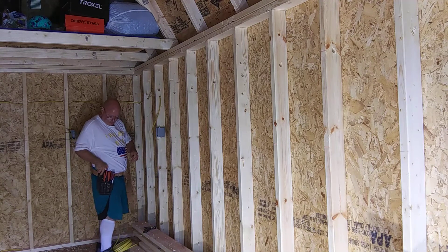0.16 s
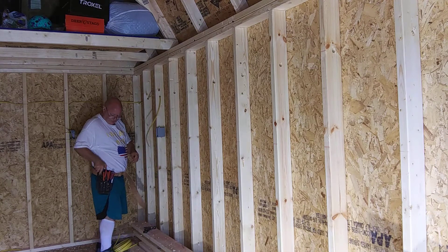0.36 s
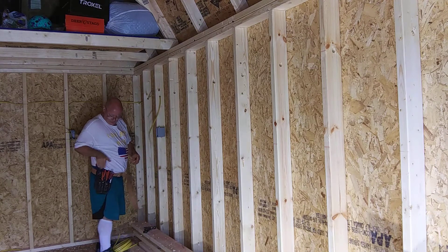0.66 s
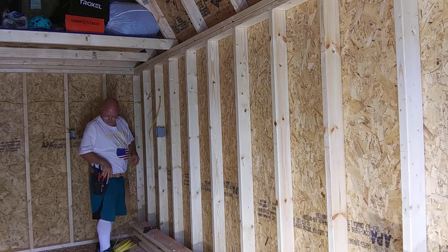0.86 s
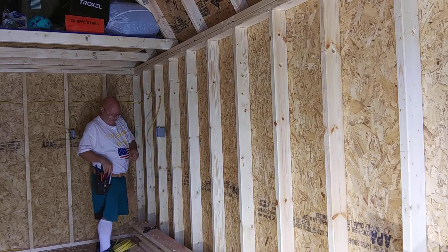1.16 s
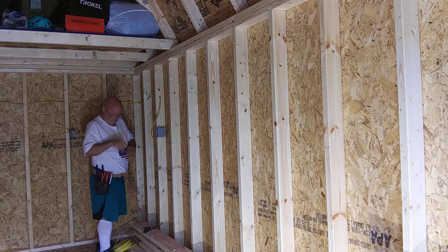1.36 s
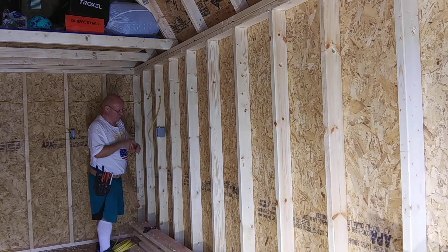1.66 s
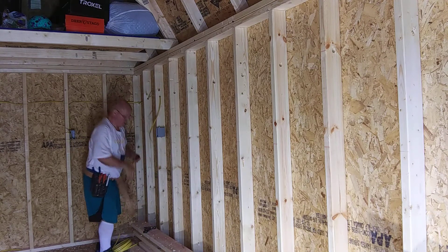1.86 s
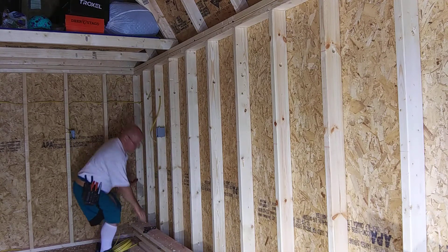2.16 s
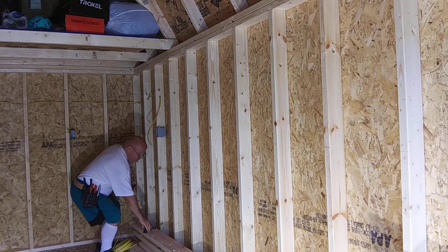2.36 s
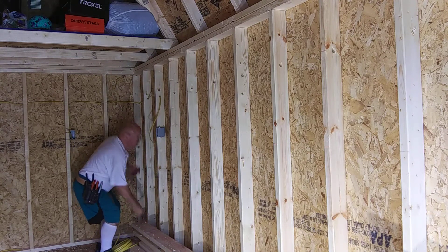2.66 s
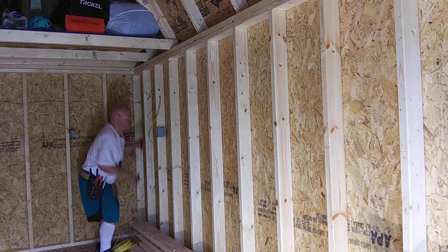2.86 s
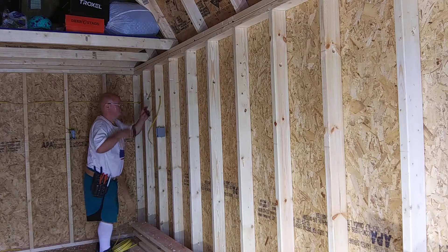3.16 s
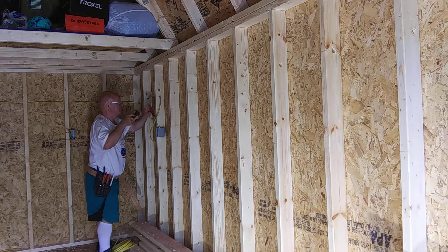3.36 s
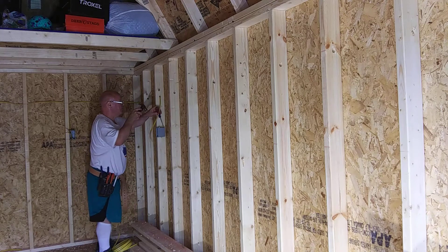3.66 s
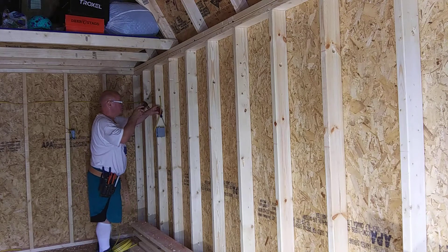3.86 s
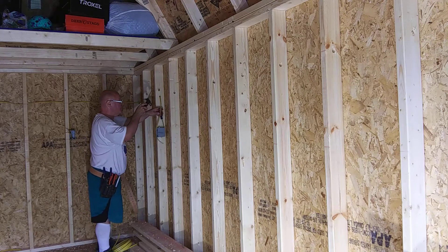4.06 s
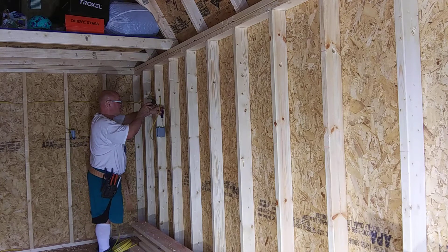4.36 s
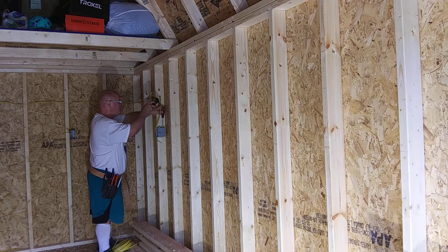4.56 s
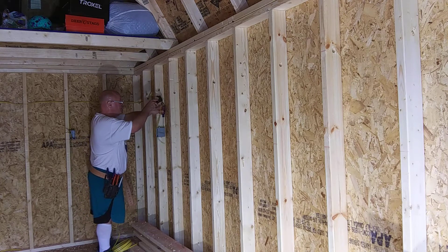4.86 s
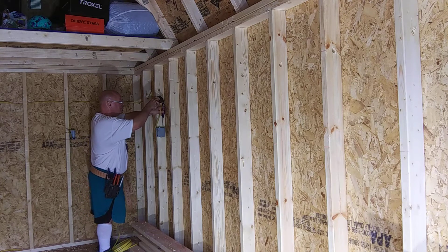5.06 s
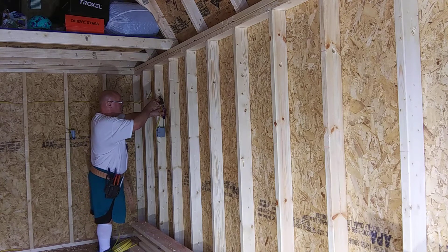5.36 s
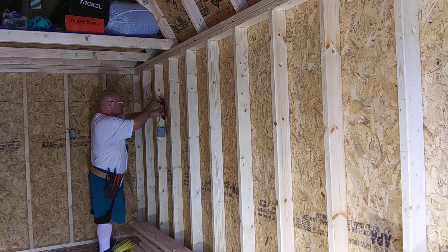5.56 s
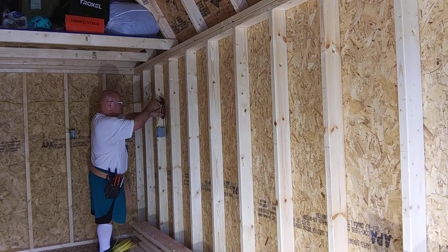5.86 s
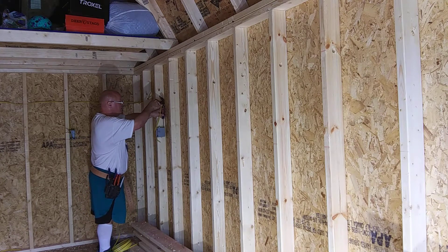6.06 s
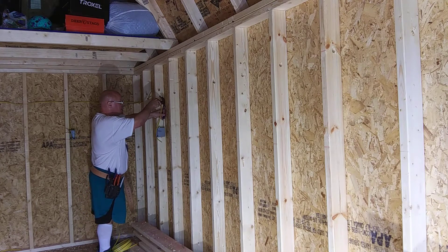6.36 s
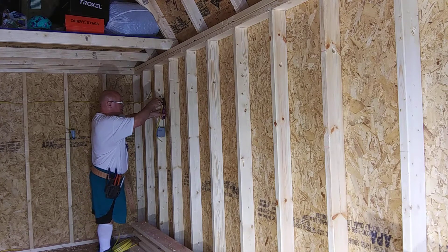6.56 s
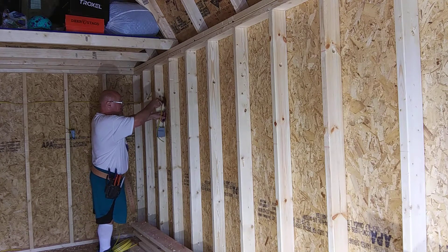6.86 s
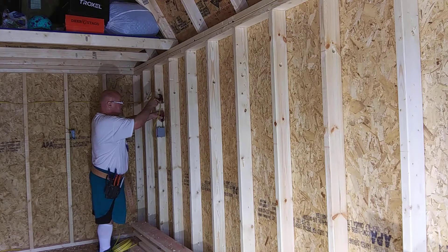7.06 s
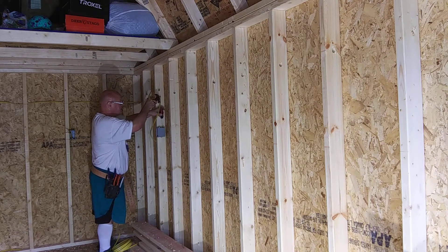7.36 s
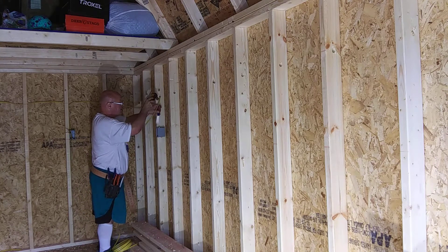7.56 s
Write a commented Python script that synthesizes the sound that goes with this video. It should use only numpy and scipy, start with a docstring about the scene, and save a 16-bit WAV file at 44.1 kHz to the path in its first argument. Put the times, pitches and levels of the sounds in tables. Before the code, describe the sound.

In a bare wooden shed, an electrical cable is dragged through stud holes with a bright, gritty rasp that catches and surges, over a faint low groan. It stops at about three seconds. Soft hand rustles lead to irregular hollow knocks on the wall, a small click, a dull thump and one hard, cracking blow, then a few faint taps. The fixed microphone stands some distance away in the short, boxy reverberation.

```python
"""Cable pulled through shed studs

An electrical cable rasps through holes in the studs of a bare wooden shed, catching and groaning, then rests.
After a soft rustle come light knocks on the wall, a click, a dull thump and one hard blow.
Random slips and short contacts drive resonant bodies, and a synthetic room carries most of each of them.
Sines make the groan, a hollow tock and the floor; filtered noise makes the rustle and the faint air."""
import sys
import numpy as np
from scipy import signal
from scipy.fft import rfft, irfft, next_fast_len
from scipy.io import wavfile
from scipy.ndimage import uniform_filter1d, map_coordinates

SR = 44100
rng = np.random.default_rng(int(sys.argv[2]) if len(sys.argv) > 2 else 0)


def dump_mix(stems):
    """Bounce the given channels to the path in sys.argv[1] as a 16-bit WAV at rate SR."""
    frames = np.atleast_2d(stems).T  # one column per channel
    limited = np.clip(frames, -1, 1)  # hard clip at full scale
    pcm = np.round(limited * 32767).astype(np.int16)
    wavfile.write(sys.argv[1], SR, pcm)


N = 340893   # length in samples

# All colours and resonances give relative levels; each sound is scaled to its loudness later.
# Colour of the rasp. Each row: frequency in Hz, level in dB.
RASP_COLOUR = [(60, -47), (130, -46), (200, -20.5), (350, -21), (420, -9.5), (560, -13.5), (800, -13.5),
               (1100, -6.5), (2000, -10), (2300, -11.5), (2700, -1.5), (3700, -9), (7400, -12),
               (9000, -20.5), (10300, -33.5), (15500, -44)]
# Resonances of cable and stud. Each row: frequency in Hz, half-width in Hz, level in dB.
CABLE_MODES = [(1026, 27, 1.5), (1996, 157, -1), (2531, 64, 8), (3080, 130, 0.5), (3267, 35, 3.5),
               (4070, 150, -2), (4954, 280, -2), (5490, 66, -31.5), (6200, 31, -87), (7076, 90, -2.5),
               (7840, 27, -21)]
# How far each band of the rasp flutters on its own. Each row: frequency in Hz, spread in dB.
FLUTTER_SPREAD = [(400, 3), (1050, 1.5), (2600, 1), (5000, -0.5), (7300, 2.5), (12000, 5)]
# Catches in a hole before the cable jerks free. Each row: time in seconds, strength in dB, time held back in seconds.
CATCHES = [(0.053, 4.5, 0.017), (.195, 3, 0.075), (.33, 1.5, 0.062), (.435, 4, 0.011), (.555, 1, 0.1),
           (.83, 3.2, 0.015), (.95, 2, 0.015), (1.075, 3, 0.07), (1.34, 1.5, 0.07), (1.695, 2, .13),
           (1.8, 2.2, 0.016), (2.05, 5, 0.0091), (2.205, 1, 0.031), (2.334, 5, 0.013), (2.44, 3.5, 0.065),
           (2.65, 0.5, 0.052), (2.765, 0, .015)]
# Colour of hands rubbing the cable. Each row: frequency in Hz, level in dB.
RUB_COLOUR = [(76, -58), (130, -37), (188, -16.5), (263, -21.5), (432, -10), (471, 3), (520, -22),
              (762, -6), (2500, -38), (3250, -50), (5500, -120)]
# Rubs of the hands. Each row: start in seconds, level in dB before attack and trim, decay in seconds.
RUBS = [(3.435, -53.5, 0.13), (3.515, -53, 0.12), (3.805, -55.5, 0.066)]
# Slides and squeaks of the sheath. Each row: start in seconds, level at the top in dB, centre in Hz,
# half-width in Hz, time to the top in seconds.
SWISHES = [(0.099, -47, 1034, 25, 0.027), (3.271, -67.5, 5130, 350, 0.048), (3.351, -65.5, 2440, 230, .08),
           (3.40, -69.5, 6340, 650, 0.059), (3.499, -73, 2820, 350, 0.08), (3.70, -64, 1250, 150, 0.09),
           (5.28, -50, 5360, 1100, 0.017), (5.461, -49.5, 3770, 700, 0.017), (5.56, -58, 2900, 400, 0.03),
           (7.322, -55, 3000, 400, 0.045)]
# Knocks on the wall. Each row: time in seconds, then ring, thud and crack in dB before the trim of each layer,
# ring pitch in Hz, thud pitch in Hz.
KNOCKS = [(4.063, -21.5, -40, -41, 1420, 490), (4.112, -28, -42, -54, 1440, 480),
          (4.227, -22.5, -30, -36.5, 1450, 382), (4.25, -23, -34, -48, 1260, 375),
          (4.603, -55.5, -57, -69, 1060, 550), (5.227, -36, -38, -54, 1190, 476),
          (5.311, -20.5, -36, -43, 1090, 477), (5.333, -30, -40, -55, 1070, 480),
          (5.48, -28.5, -40.5, -46.5, 1220, 330), (5.565, -41.5, -54, -61, 993, 356),
          (5.69, -25.5, -44.5, -51.5, 1410, 324), (5.794, -34.5, -43.5, -60.5, 1260, 467),
          (5.979, -47.5, -69, -61.5, 1270, 374), (6.135, -43, -45.5, -60.5, 1180, 332),
          (6.29, -45, -45.5, -73, 1200, 430), (6.356, -38, -44.5, -61.5, 1140, 480),
          (7.044, -37.5, -46, -63.5, 996, 360), (7.066, -38.5, -61, -64, 1200, 475),
          (7.294, -39, -47.5, -65, 1240, 463), (7.327, -32.5, -43, -56.5, 1190, 540),
          (7.365, -33, -40.5, -60, 1250, 471), (7.415, -43, -45.5, -56.5, 1040, 342),
          (7.699, -54, -68, -73, 1070, 590)]
# Colour of the stud wall. Each row: frequency in Hz, level in dB.
WALL_COLOUR = [(60, -69), (110, -39), (200, -22.5), (310, -10), (500, -10), (730, -14), (1030, 4.5),
               (1400, -5), (1700, -7), (1920, -22.5), (2450, -8.5), (3150, -25), (4000, -29), (9000, -55.5)]
# Resonances of the stud wall. Each row: frequency in Hz, half-width in Hz, level in dB before a random change.
WALL_MODES = [(378, 26, -5), (473.2, 15, 0), (618, 21, -8), (1046, 52, 2.5), (1182, 51, 7), (1288, 18, 5),
              (1415, 30, 4.5), (1680, 68, -5.5), (2132, 37, -9), (2458, 79, -6), (2910, 93, -14),
              (3140, 24, -9)]
# Colour of the bright crack of the touch. Each row: frequency in Hz, level in dB.
CRACK_COLOUR = [(200, -53), (1500, -33), (3000, 2), (5000, 2.5), (6600, -3.5), (8500, -12), (11000, -22),
                (15500, -32)]
# Resonances of the crack. Each row: frequency in Hz, half-width in Hz, level in dB.
CRACK_MODES = [(2950, 75, 8), (4120, 100, -3), (5230, 96, -13), (6200, 200, -11.5)]
# Colour of the click. Each row: frequency in Hz, level in dB.
CLICK_COLOUR = [(200, -60), (2500, -22), (4300, -14), (4700, -8), (5400, -8), (6200, -4), (7000, -7),
                (8000, -21), (12000, -39)]
# Colour of the dull thump. Each row: frequency in Hz, level in dB.
THUMP_COLOUR = [(53, -79.5), (90, -55), (286, -15), (362, -13), (478, -10.5), (555, -18), (605, -9),
                (948, -7), (1200, -7), (1360, -28), (1690, -15), (2280, -33), (2480, -31), (3280, -34.5),
                (15000, -55.5)]
# Resonances of the thump. Each row: frequency in Hz, half-width in Hz, level in dB.
THUMP_MODES = [(420, 76, -22), (940, 130, 5), (1180, 27, 4), (1700, 82, -1), (2080, 32, -6),
               (2420, 24, -21)]
# Colour of the snap that leads the hard blow. Each row: frequency in Hz, level in dB.
SNAP_COLOUR = [(100, -32), (600, -5.5), (2500, -4), (4500, -0.5), (6300, 0), (9000, -11.5), (12000, -18.5),
               (15800, -22)]
# Colour of the hard blow. Each row: frequency in Hz, level in dB.
BLOW_COLOUR = [(53, -83), (90, -53.5), (127, -34), (359, -5.5), (392, -3), (553, -5), (630, 1), (1150, 3.5),
               (1290, 0.5), (1400, 1), (1940, -6.5), (2510, 0), (3630, -18), (6100, -30.5), (15800, -57.5)]
# Resonances of the blow. Each row: frequency in Hz, half-width in Hz, level in dB.
BLOW_MODES = [(1010, 15, -6), (1220, 46, 3), (1650, 43, -0.5), (1990, 50, -10), (2454, 28, 10),
              (3120, 40, 3), (3630, 55, -17), (5140, 24, -5), (5500, 64, -13), (6400, 62, -18)]
# Thuds of the floor. Each row: start in seconds, level in dB.
FLOOR_THUDS = [(4.228, -72), (6.488, -64), (6.75, -63), (7.322, -66)]
# Colour of the still air. Each row: frequency in Hz, level in dB.
AIR_COLOUR = [(15, -90), (25, -54), (241, -13), (425, -1), (473, -3.5), (542, -12), (587, -1.5),
              (710, -5.5), (769, -2), (1320, -7), (1430, -9), (2460, -14), (3050, -20.5), (4450, -17),
              (15800, -29.5)]
# Decay of the shed. Each row: frequency in Hz, time to fall 60 dB in seconds before the life factor.
SHED_DECAY = [(150, 1), (400, 0.63), (1200, 0.57), (2700, 0.4), (6000, 0.55), (13000, 0.22)]

# The pull: start and end of the slowing (s), level (dB), fall while slowing, extra fall once stopped (dB per s)
SLOWING_S, STOP_S, PULL_DB, RUN_OUT_DB_PER_S, STOP_DB_PER_S = 2.874, 3.12, -38.5, 84.5, 70
# A jerk rises quickly and dies away (s); its height against the dip
BREAK_FREE_S, JERK_S, JERK_SHARE = 0.011, 0.071, 1.08
# Low scrape of the stud (dB), and the share of the effort that it follows
SCRAPE_DB, SCRAPE_FOLLOWS = -38, 0.65
# Treble of the rasp against its middle (dB), and the share of the effort that it gains on top
BRIGHT_DB, BRIGHT_FOLLOWS = -2.5, 0.15
# Groan: pitch while pulling and while slowing (Hz), level (dB), share of the effort it follows
GROAN_HZ, GROAN_SLOW_HZ, GROAN_DB, GROAN_FOLLOWS = 306.7, 297, -56.5, 0.091
RUB_ATTACK_S = 0.012
CONTACT_S = 0.0065   # decay of a knock's force on the wall
# The sharper the crack, the more the wall's upper modes ring: level (dB) at the usual crack (dB), dB per dB
UPPER_RING_DB, UPPER_FOLLOWS, USUAL_CRACK_DB = -33, 1.17, -48.5
AIR_DB = -62
CUTOFF_HZ = 15950


def from_db(db):
    """Decibels to gain."""
    return 10 ** (np.asarray(db) / 20)


def rms_one(x):
    """Scale to unit rms."""
    return x / np.sqrt(np.mean(x ** 2) + 1e-20)


def at_hz(points, hz):
    """Read a table on a log-frequency axis."""
    points = np.array(points)
    return np.interp(np.log(hz + 1e-3), np.log(points[:, 0]), points[:, 1])


def drift(rate):
    """Smooth random wander with unit rms, through rate random points per second."""
    knots = rng.standard_normal(4000)
    coarse = np.arange(0, N + 32, 32)
    curve = map_coordinates(knots, [coarse / SR * rate], order=3, mode="wrap")
    return rms_one(np.interp(np.arange(N), coarse, curve))


def add(out, s, sound):
    """Mix a sound in at time s."""
    at = max(0, int(s * SR))
    out[at:at + len(sound)] += sound[:max(0, N - at)]


def through(x, response):
    """Pass a signal through a response."""
    return signal.fftconvolve(x, response)[:len(x)]


def split(x, low_hz, high_hz):
    """Bass, middle and treble of a sound, which sum back to it."""
    half = next_fast_len(len(x))
    spectrum, hz = rfft(x, 2 * half), np.linspace(0, SR / 2, half + 1)
    low = irfft(spectrum / (1 + (hz / low_hz) ** 6))[:len(x)]
    below_treble = irfft(spectrum / (1 + (hz / high_hz) ** 6))[:len(x)]
    return low, below_treble - low, x - below_treble


def even_out(x, width_hz):
    """Keep timing and fine ripple, but flatten the broad spectrum to about unit energy."""
    spectrum = rfft(x, 2 * len(x))
    bins = max(3, int(width_hz * 2 * len(x) / SR))
    broad = uniform_filter1d(np.abs(spectrum) ** 2, bins)
    return irfft(spectrum / np.sqrt(np.abs(broad) + 1e-12))[:len(x)]


def body(colour, modes=(), ring_db=0., size=4096):
    """Causal response of a body: a broad colour with resonances standing on it."""
    hz = np.arange(size // 2 + 1) * SR / size
    power = rms_one(from_db(at_hz(colour, hz))) ** 2
    if len(modes):
        peaks = 0
        for f, width, db in modes:
            radiation = np.minimum(hz / f, 1) ** 2   # a resonance radiates poorly below its own pitch
            peaks = peaks + (from_db(db) * radiation / (1 + ((hz - f) / width) ** 2)) ** 2
        power = power + from_db(ring_db) ** 2 * peaks / peaks.mean()
    cepstrum = irfft(np.log(power / power.mean() + 1e-12) / 2)
    cepstrum[1:size // 2] *= 2   # minimum phase: nothing sounds before the touch
    cepstrum[size // 2 + 1:] = 0
    return irfft(np.exp(rfft(cepstrum)))


def shed(build_s, early_db, direct=1., life=0.73, size=32768):
    """Room response: sparse early echoes over a thickening tail, each band dying at its own rate; life scales it."""
    t, hz = np.arange(size) / SR, np.arange(size // 2 + 1) * SR / size
    tail = rng.standard_normal(size) * (1 - np.exp(-t / build_s))
    early = rng.choice([-1., 1.], size) * (rng.random(size) < 600 / SR) * (t > .003)
    early[0] = direct
    spectrum = rfft(tail + from_db(early_db) * early * np.exp(-t / 0.051))
    centres = np.geomspace(125, 16000, 8)
    room = np.zeros(size)
    for f, share in zip(centres, np.eye(len(centres))):
        band = irfft(spectrum * at_hz(list(zip(centres, share)), hz))
        room += band * from_db(-60 * t / (life * at_hz(SHED_DECAY, f)))
    return room


def contact(rise_s, length_s, size=8192):
    """A run of tiny slips under a force that builds and lets go."""
    t = np.arange(size) / SR
    slips = rng.choice([-1., 1.], size) * (rng.random(size) < 900 / SR)
    slips[0] = 1
    return slips * (1.15 - np.exp(-t / max(rise_s, 1e-4))) * np.exp(-t / max(length_s, 1e-3))


def strike(response, room, rise_s, length_s):
    """One contact on a body, heard across the room; its energy equals 70 ms at rms 1."""
    excitation = even_out(through(room, contact(rise_s, length_s)), width_hz=109)
    sound = through(excitation, response)
    return sound / np.sqrt(np.sum(sound ** 2) / (.07 * SR))


def pull_effort():
    """Effort in dB about its steady value: it sags at each catch, overshoots as the cable frees, and runs out."""
    t = np.arange(N) / SR
    effort_db = -RUN_OUT_DB_PER_S * np.maximum(t - SLOWING_S, 0) - STOP_DB_PER_S * np.maximum(t - STOP_S, 0)
    for s, db, held_s in CATCHES:
        dip = np.exp(-((t - s) / held_s) ** 4)
        jerk = JERK_SHARE * np.exp(-((t - s) / JERK_S) ** 2)
        # tanh turns the first shape into a dip and the second into a surge
        effort_db = effort_db + db * np.where(t < s, dip, jerk) * np.tanh((t - s) / BREAK_FREE_S)
    return effort_db


def rasp(effort_db):
    """In two holes the sheath slips over wood fibres thousands of times a second; a harder pull is brighter."""
    slips = rng.standard_normal((2, N)) * (rng.random((2, N)) < 5000 / SR) * from_db(2 * drift(160))
    heard = np.zeros(N)
    for hole in slips:
        heard += through(hole, even_out(shed(build_s=0.011, early_db=15), width_hz=206))
    sound = rms_one(flutter(through(heard, body(RASP_COLOUR, CABLE_MODES, ring_db=0.0))))
    low, middle, high = split(sound, low_hz=1630, high_hz=5940)
    bright_db = BRIGHT_DB + BRIGHT_FOLLOWS * effort_db + 1.3 * drift(30.24)
    sheath = from_db(PULL_DB + effort_db) * (middle + high * from_db(bright_db))
    scrape = low * from_db(SCRAPE_DB + SCRAPE_FOLLOWS * effort_db)
    return scrape + sheath


def flutter(x):
    """The sheath twists in the hole, so each range of pitch swells by itself."""
    size = next_fast_len(N)
    spectrum, hz = rfft(x, size), np.arange(size // 2 + 1) * SR / size
    centres = np.geomspace(500, 10000, 9)
    out = np.zeros(N)
    for f, share in zip(centres, np.eye(len(centres))):
        band = irfft(spectrum * at_hz(list(zip(centres, share)), hz), size)[:N]
        out += band * from_db(at_hz(FLUTTER_SPREAD, f) * drift(39.94))
    return out


def groan(effort_db):
    """Regular stick and slip gives a low wavering sine; it sinks and steadies as the cable slows, then fades."""
    t = np.arange(N) / SR
    pulling = np.interp(t, [SLOWING_S - .1, SLOWING_S], [1, 0])
    waver = (0.012 + 0.027 * pulling) * drift(40) + 0.0083 * pulling * drift(9)
    pitch_hz = (GROAN_SLOW_HZ + (GROAN_HZ - GROAN_SLOW_HZ) * pulling) * (1 + waver)
    release = np.exp(-np.maximum(t - STOP_S, 0) / 0.023)
    level = from_db(GROAN_DB + GROAN_FOLLOWS * effort_db + 2.6 * drift(60))
    return release * level * np.sin(2 * np.pi * np.cumsum(pitch_hz) / SR)


def tock():
    """A hollow tock during the pull: two low modes, the lower outlasting the upper."""
    out, t = np.zeros(N), np.arange(SR // 4) / SR
    upper = np.sin(2 * np.pi * 655 * t) * from_db(-60 * t / 0.13)
    lower = 0.31 * np.sin(2 * np.pi * 590 * t) * from_db(-60 * t / 0.44)
    onset = (1 - np.exp(-t / 0.0011)) ** 2
    add(out, .941, from_db(-34.0) * (upper + lower) * onset)
    return out


def rustle():
    """Hands rub along the cable as coloured noise; its sheath swishes and squeaks as bands of noise."""
    rub_power, t = np.zeros(N), np.arange(SR // 2) / SR
    for s, db, decay_s in RUBS:
        swell = from_db(db) * (1 - np.exp(-t / RUB_ATTACK_S)) * np.exp(-t / decay_s)
        add(rub_power, s, swell ** 2)
    rubbing = rms_one(through(rng.standard_normal(N), body(RUB_COLOUR)))
    out = np.sqrt(rub_power) * rubbing * from_db(1.0 + 0.96 * drift(50))
    for s, db, hz, width_hz, top_s in SWISHES:
        edges_hz = [max(hz - width_hz, 100), hz + width_hz]
        band = signal.butter(2, edges_hz, "band", fs=SR, output="sos")
        hiss = rms_one(signal.sosfilt(band, rng.standard_normal(len(t))))
        add(out, s, from_db(db) * hiss * t / top_s * np.exp(1 - t / top_s))
    return out


def knocks():
    """A short crack comes straight from the touch; the whole wall answers more slowly with thud and ring."""
    out, crack = np.zeros(N), body(CRACK_COLOUR, CRACK_MODES, ring_db=-1.5)
    from_wall = shed(build_s=0.012, early_db=17.5, direct=1.02, life=0.75)
    from_touch = shed(build_s=0.00043, early_db=4.5, direct=3.7)
    for s, ring_db, thud_db, crack_db, ring_hz, thud_hz in KNOCKS:
        modes = [(hz, width, db + 2 * rng.standard_normal()) for hz, width, db in WALL_MODES]
        spot = [(ring_hz, 90, 3), (thud_hz, 45, -5)]   # each spot on the wall favours two pitches of its own
        wall = body(WALL_COLOUR, modes + spot, ring_db=5.5)
        answer = strike(wall, from_wall, rise_s=0.009, length_s=CONTACT_S)
        thud, ring, upper = split(answer, low_hz=800, high_hz=2100)
        upper_db = UPPER_RING_DB + UPPER_FOLLOWS * (crack_db - USUAL_CRACK_DB)
        touch_s = s - .003   # crack and answer both start 3 ms ahead of the listed time
        add(out, touch_s, thud * from_db(thud_db + 8) + ring * from_db(ring_db - 7.5) + upper * from_db(upper_db))
        snap = strike(crack, from_touch, rise_s=0.00074, length_s=CONTACT_S / 2)
        add(out, touch_s, from_db(crack_db - 3.0) * snap)
    return out


def single_contacts():
    """A plastic click, a dull thump and a hard blow led by a snap, each a contact on a body of its own colour."""
    out, room = np.zeros(N), shed(build_s=0.0022, early_db=19.5, direct=1.0)
    thump = body(THUMP_COLOUR, THUMP_MODES, ring_db=-7)
    blow = body(BLOW_COLOUR, BLOW_MODES, ring_db=-11.5)
    add(out, 6.131, from_db(-52.5) * strike(body(CLICK_COLOUR), room, rise_s=0.0016, length_s=0.006))
    add(out, 6.485, from_db(-31.5) * strike(thump, room, rise_s=.008, length_s=0.0073))
    add(out, 6.747, from_db(-25.0) * strike(body(SNAP_COLOUR), room, rise_s=.001, length_s=0.0017))
    add(out, 6.752, from_db(-17.0) * strike(blow, room, rise_s=0.002, length_s=0.002))
    return out


def floor_thuds():
    """The floor gives a little under some of the contacts: a 55 Hz sine that dies within milliseconds."""
    out, t = np.zeros(N), np.arange(SR // 8) / SR
    for s, db in FLOOR_THUDS:
        add(out, s, from_db(db) * np.sin(2 * np.pi * 55 * t) * np.exp(-t / 0.0077))
    return out


def still_air():
    """Faint steady noise, coloured as the background of the shed."""
    return from_db(AIR_DB) * rms_one(through(rng.standard_normal(N), body(AIR_COLOUR)))


def scene():
    """All sources over the faint background of the shed."""
    effort_db = pull_effort()
    cable = rasp(effort_db) + groan(effort_db) + tock() + rustle()
    contacts = knocks() + single_contacts() + floor_thuds()
    return (cable + contacts + still_air())[None]


def record(dry):
    """Cut the top steeply with an elliptic low-pass."""
    low_pass = signal.ellip(12, .1, 80, CUTOFF_HZ, fs=SR, output="sos")
    return signal.sosfilt(low_pass, dry)


dry = scene()
out = record(dry)
dump_mix(out)
```